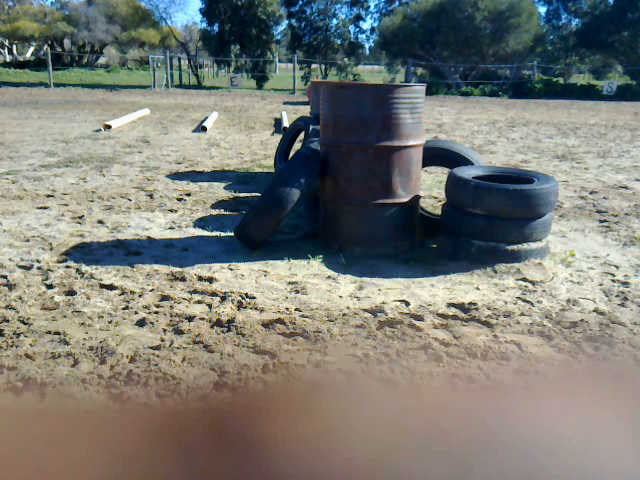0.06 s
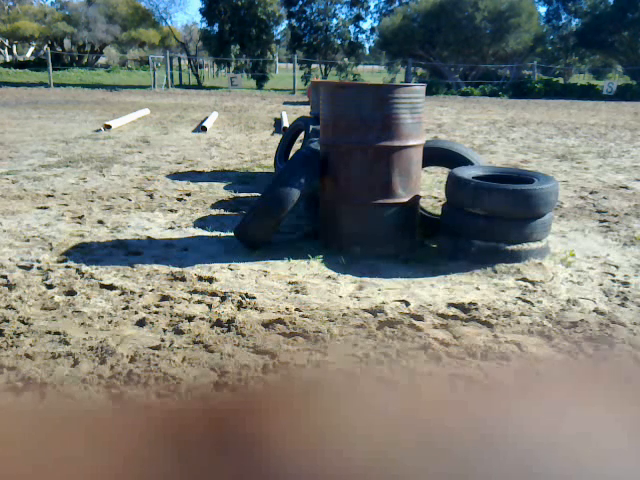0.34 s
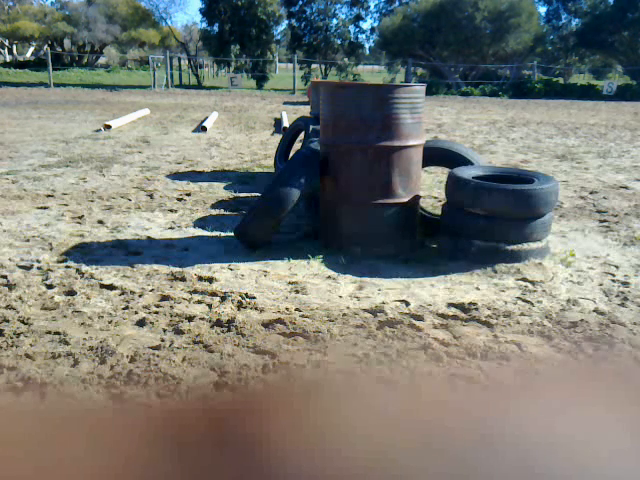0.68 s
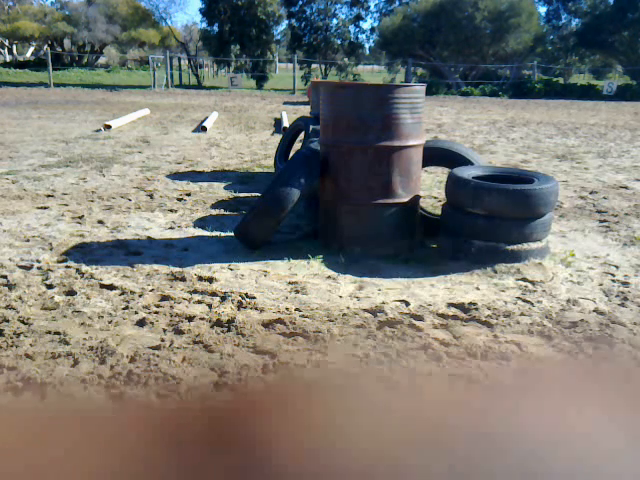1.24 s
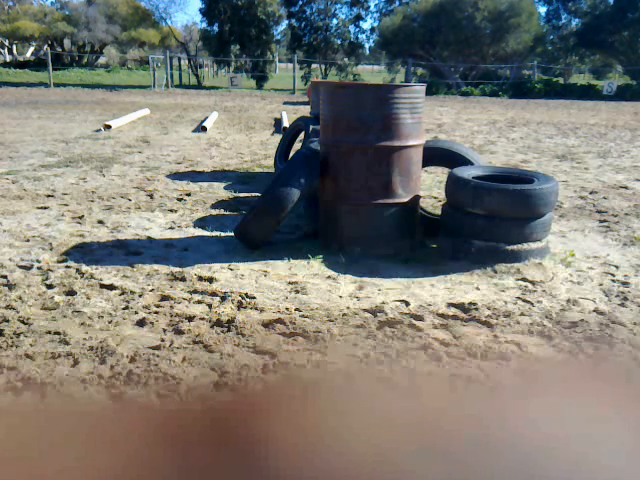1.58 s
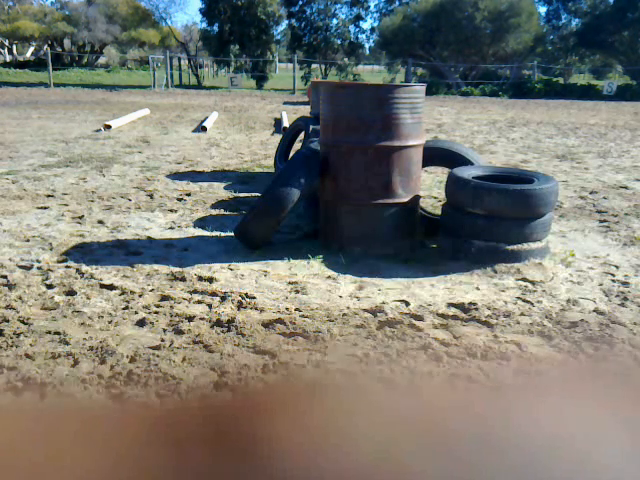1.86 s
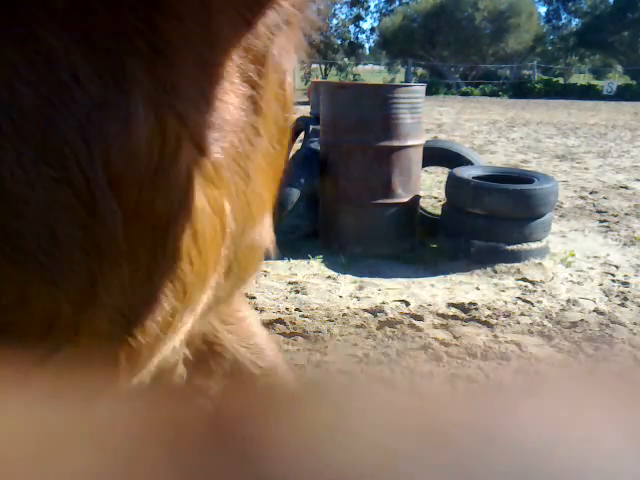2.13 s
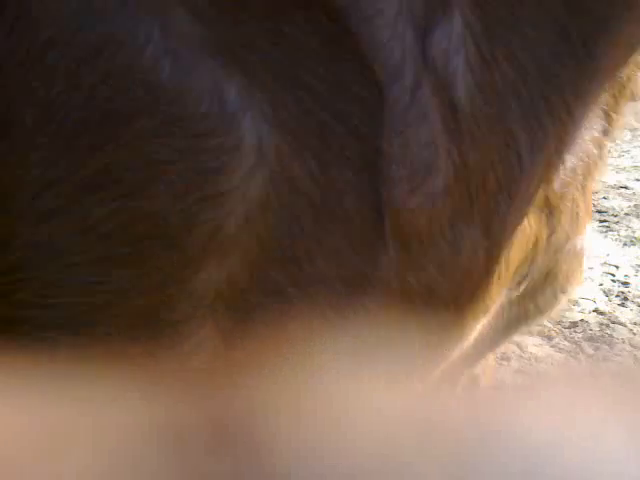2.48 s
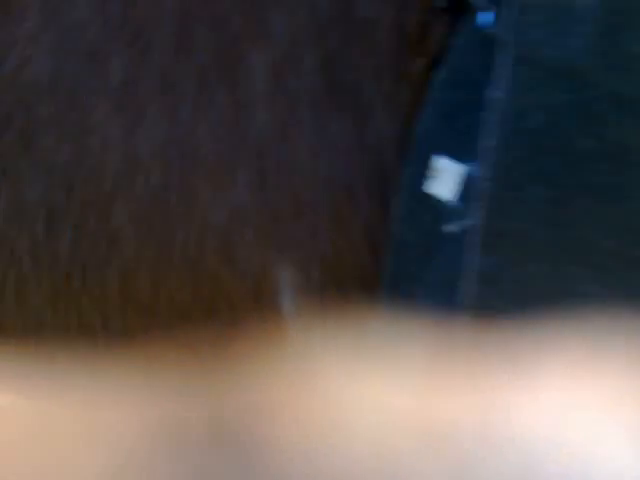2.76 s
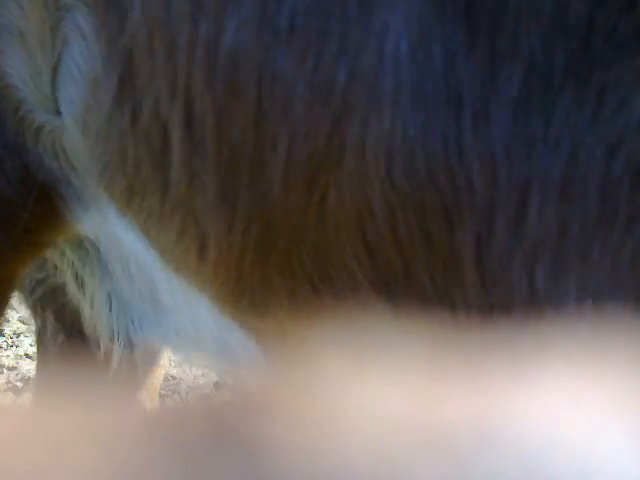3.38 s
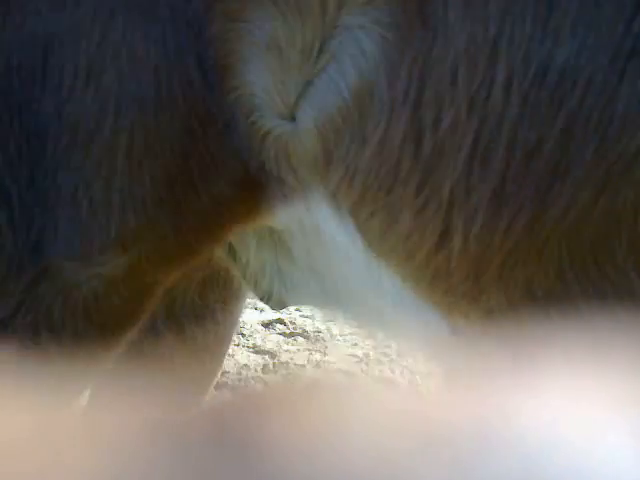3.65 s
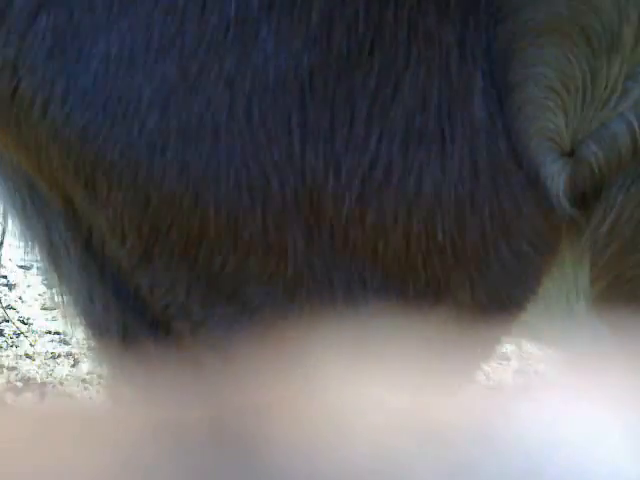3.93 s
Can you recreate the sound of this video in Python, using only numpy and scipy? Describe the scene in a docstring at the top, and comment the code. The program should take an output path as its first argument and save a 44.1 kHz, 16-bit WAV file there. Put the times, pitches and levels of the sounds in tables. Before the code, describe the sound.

Wind rumbles and thumps on a small microphone in uneven gusts, over a faint rush of distant trees. After about a second, a horse walks close by in a sandy paddock, with very soft scuffs and ticks.

```python
"""Wind buffets a small camera's microphone in a sandy paddock, over a bed of distant rushing trees
and the faint whine of the camera's electronics. Almost at once the gusts arrive: faster air gives
louder, quicker eddies. A far bird calls, and single eddies start to thump. From just past one
second a horse walks close by with soft scuffs and ticks in the sand; the bird calls once more,
and the gusts and hooves carry on to the end."""
import sys
import numpy as np
from scipy import signal
from scipy.fft import rfft, irfft
from scipy.io import wavfile
from scipy.ndimage import uniform_filter1d, map_coordinates

SR = 44100
rng = np.random.default_rng(int(sys.argv[2]) if len(sys.argv) > 2 else 0)


def store_wav(level_fs):
    """Save 16-bit WAV to argv[1]."""
    pcm = np.round(np.clip(np.atleast_2d(level_fs), -1, 1) * 32767)
    wavfile.write(sys.argv[1], SR, pcm.T.astype(np.int16))


N = 176400

# light air between the gusts: time_s, level_db
BREEZE_LEVEL = [(0, -33.5), (.15, -30), (.6, -27.5), (.7, -34), (.9, -38.5), (1.22, -40.5), (1.32, -30.5),
                (1.52, -33.5), (1.75, -26), (2.13, -27), (2.2, -40), (2.36, -30.5), (2.8, -29), (2.89, -30),
                (3.05, -27.5), (3.3, -35.5), (3.5, -28.5), (3.86, -29), (3.96, -38), (4, -37.5)]
# gusts on the microphone: start_s, length_s, level_db, eddy_rate_hz
WIND_GUSTS = [(0.198, 0.041, -22, 80.54), (0.304, 0.043, -21.5, 233.6), (0.413, 0.044, -16.5, 179.2),
              (0.481, 0.013, -21.5, 120.5), (.535, 0.082, -26.5, 121.9), (1.398, 0.034, -18.5, 170.2),
              (1.446, 0.024, -24, 149.6), (1.558, 0.029, -21.5, 120.4), (1.628, .026, -29.5, 182.5),
              (1.81, 0.053, -22.5, 125.2), (1.895, 0.019, -22.5, 185.3), (2.002, .03, -30, 135),
              (2.096, 0.037, -35, 124.7), (2.416, 0.087, -27.5, 129.7), (2.546, 0.033, -22.5, 175.5),
              (2.605, 0.047, -17, 148), (2.669, .035, -20, 248.8), (2.709, .032, -29, 220.2),
              (3.065, 0.069, -32, 194.8), (3.159, 0.042, -26.5, 160.3), (3.235, .025, -24, 105.1),
              (3.339, .03, -24.5, 120.6), (3.491, 0.034, -27, 114.6), (3.588, 0.029, -22, 120.3),
              (3.796, 0.034, -20, 116.4)]
# tone of the turbulence at an eddy rate of BASE_EDDY_HZ: frequency_hz, level_db
WIND_SPECTRUM = [(6, -12.5), (20, -2.5), (45, 0), (80, -1.5), (120, -6.5), (190, -17.5), (320, -33),
                 (600, -55), (1500, -92)]
# level of the distant rush, ducking under the wind gusts: time_s, level_db
RUSH_LEVEL = [(0, -47.5), (.33, -48.5), (.42, -51.5), (.7, -52), (.87, -48.5), (1.3, -48.5), (1.5, -50.5),
              (1.9, -52.5), (2.17, -54), (2.42, -52), (2.85, -53), (3.15, -56), (3.45, -52.5), (4, -53.5)]
# tone of the trees' rush: frequency_hz, level_db
RUSH_SPECTRUM = [(100, -2.5), (300, 3.5), (600, -6.5), (800, -3), (1050, 0), (1450, -4.5), (1900, -12.5),
                 (2400, -21), (3100, -36), (5000, -57.5)]
# fine hiss of leaves and air: time_s, level_db
HISS_LEVEL = [(0, -69), (.3, -72), (.65, -75), (1.05, -70), (1.4, -71), (1.7, -70.5), (2.15, -77.5),
              (2.55, -71.5), (3.05, -76.5), (3.5, -72), (4, -75.5)]
# tone of that hiss: frequency_hz, level_db
HISS_SPECTRUM = [(1000, -2.5), (3000, -2), (5500, -4.5), (6700, -5), (7800, -5.5), (9000, -5.5),
                 (12000, -8.5), (15500, -9.5)]
# falling calls of a distant bird: start_s, length_s, level_db, pitch_hz
BIRD_CALLS = [(0.228, 0.044, -80, 3560), (2.363, .06, -82, 3355)]
# lone eddies, each a push and then a pull: time_s, peak_db, half_width_s
EDDY_THUMPS = [(.370, -12, 0.0015), (1.341, -12, .0019), (1.427, -16, 0.0016), (1.465, -11, 0.0019),
               (1.573, -14.5, .0016), (1.899, -19, 0.0009), (1.955, -12.5, 0.0013), (1.978, -13.5, 0.002),
               (2.013, -13, 0.0012), (2.319, -18.5, 0.0018), (2.552, -16, 0.00084), (2.572, -15, 0.0023),
               (2.942, -11.5, 0.0025), (3.008, -13.5, 0.002), (3.11, -20.5, 0.00085),
               (3.468, -11.5, 0.0018), (3.683, -21, 0.0044), (3.824, -12, 0.0026), (3.885, -15, 0.0021)]
# hooves scuffing the sand: start_s, length_s, level_db, centre_hz, width_octaves
HOOF_SCUFFS = [(1.253, 0.0055, -62.5, 5800, 0.75), (1.314, 0.12, -73.5, 5040, 0.6),
               (1.382, 0.014, -60.5, 1981, 0.41), (1.525, 0.0064, -62, 5725, 0.65),
               (1.855, 0.035, -71.5, 4100, 0.63), (2.014, .025, -76, 5550, .55),
               (2.522, 0.035, -77.5, 5130, 0.73), (2.74, 0.056, -79, 3820, 0.59),
               (2.958, 0.029, -78, 5320, .25), (3.158, 0.29, -79, 2700, 0.32),
               (3.239, 0.011, -58, 1100, 0.82), (3.417, 0.027, -68, 2849, 0.44),
               (3.427, .025, -73.5, 8000, 0.53), (3.572, 0.026, -72, 5209, 0.44),
               (3.721, .11, -79.5, 3497, 0.95)]
# ticks and knocks of hooves on grit: time_s, level_db, centre_hz, width_octaves
HOOF_TICKS = [(1.623, -69, 4960, 0.44), (2.177, -68, 4205, .7), (2.237, -66.5, 2200, 0.39),
              (2.934, -42, 557.3, .35), (3.112, -54, 1500, 0.53)]

BASE_EDDY_HZ, BREEZE_EDDY_HZ = 100, 85.76
BREEZE_SPEEDUP = .15  # eddy rate follows the breeze's amplitude to this power
LARGE_EDDY_HZ, LARGE_EDDY_DB = 70.5, -5.5  # big slow eddies: a gust lifts their level, not their speed
EVENNESS, EVEN_WINDOW_S = .92, .034  # how firmly and how fast the rumble's own swells are levelled
RUSH_BRIGHTEN, FLUTTER_DB = .6, 1.0  # extra treble in dB per dB of level; flutter depth
WHINE_HZ, WHINE_DB, WHINE_FLIPS_PER_S = (10282.5, 7711.5), (-75, -92.5), 59.85
WHINE_FOLLOW = .67  # dB of whine per dB of hiss
CALL_FALL_HZ, CALL_EDGE_S = 200, .012
SCUFF_EDGE_S, GRAIN_DB = .0083, 3.5
OVERLOAD_DB, FADE_IN_S, TOP_HZ = -11.5, .006, 15650


def undb(db):
    """Decibels to gain."""
    return 10 ** (np.asarray(db) / 20)


def unit(x):
    """Scale to rms 1."""
    return x / np.sqrt(np.mean(x ** 2))


def curve(t, rows):
    """Straight ramps through rows of time_s, value."""
    return np.interp(t, *np.array(rows).T)


def noise(spectrum):
    """Noise coloured by rows of frequency_hz, level_db."""
    hz, db = np.array(spectrum).T
    f = np.maximum(np.fft.rfftfreq(N, 1 / SR), 1)
    gain = undb(np.interp(np.log(f), np.log(hz), db))
    return unit(irfft(rfft(rng.standard_normal(N)) * gain, N))


def band(x, hz, octaves):
    """A bell-shaped band of x around hz, at rms 1."""
    f = np.maximum(np.fft.rfftfreq(N, 1 / SR), 1)
    bell = np.exp(-.5 * (np.log2(f / hz) / octaves) ** 2)
    return unit(irfft(rfft(x) * bell, N))


def swell(t, start, length, rise_s, fall_s):
    """An envelope that eases up to start, holds for length and eases away."""
    return np.exp(-(np.minimum(t - start, 0) / rise_s) ** 2
                  - (np.maximum(t - start - length, 0) / fall_s) ** 2)


def flutter(rate_hz):
    """Glides between random values, at rms 1."""
    hold = int(SR / rate_hz)
    steps = rng.standard_normal(N)[np.arange(N) // hold]
    return unit(uniform_filter1d(steps, hold))


def buffeting(t):
    """Turbulence rumbles over the microphone: a gust makes it louder and drives its small eddies faster."""
    breeze_db = curve(t, BREEZE_LEVEL)
    power = undb(breeze_db) ** 2
    eddy_hz = BREEZE_EDDY_HZ * undb(BREEZE_SPEEDUP * (breeze_db - breeze_db.mean()))
    for start, length, db, hz in WIND_GUSTS:
        gust = swell(t, start, length, rise_s=.007, fall_s=.01)
        power += (undb(db) * gust) ** 2
        eddy_hz += (hz - eddy_hz) * gust
    air = noise(WIND_SPECTRUM)
    # level the rumble so that breeze and gusts set the dynamics
    air_power = uniform_filter1d(np.abs(signal.hilbert(air)) ** 2, int(EVEN_WINDOW_S * SR), mode="wrap")
    air = unit(air / air_power ** (EVENNESS / 2))
    playhead = np.cumsum(eddy_hz / BASE_EDDY_HZ)  # varispeed: faster air, higher rumble
    small_eddies = map_coordinates(air, [playhead], order=3, mode="grid-wrap")
    large_eddies = band(rng.standard_normal(N), LARGE_EDDY_HZ, octaves=.71)
    return np.sqrt(power) * unit(small_eddies + undb(LARGE_EDDY_DB) * large_eddies)


def trees(t):
    """Far trees make a fluttering rush, duller where its level dips, with a fine leaf hiss on top."""
    db = curve(t, RUSH_LEVEL)
    rush = noise(RUSH_SPECTRUM)
    treble = signal.sosfiltfilt(signal.butter(2, 1600, "high", fs=SR, output="sos"), rush)
    rush += (undb(RUSH_BRIGHTEN * (db - db.mean())) - 1) * treble
    rush *= undb(db + FLUTTER_DB * flutter(rate_hz=28))
    hiss = undb(curve(t, HISS_LEVEL)) * noise(HISS_SPECTRUM)
    return rush + hiss


def whine(t):
    """Two thin electronic tones, buzzing as their polarity flips, ride up and down with the hiss."""
    hiss_db = curve(t, HISS_LEVEL)
    tones = sum(undb(db) * np.sqrt(2) * np.sin(2 * np.pi * hz * t) for hz, db in zip(WHINE_HZ, WHINE_DB))
    polarity = np.sign(np.sin(np.pi * WHINE_FLIPS_PER_S * t))
    return tones * polarity * undb(WHINE_FOLLOW * (hiss_db - hiss_db.mean()))


def bird(t):
    """A far bird's thin whistle, sagging in pitch toward its tail."""
    out = np.zeros(N)
    for start, length, db, hz in BIRD_CALLS:
        pitch_hz = hz - CALL_FALL_HZ * np.clip((t - start) / length, 0, 2) ** 2
        whistle = np.sin(2 * np.pi * np.cumsum(pitch_hz) / SR)
        out += undb(db) * swell(t, start, length, CALL_EDGE_S, CALL_EDGE_S) * whistle
    return out


def thumps(t):
    """A lone eddy crosses the microphone port: pressure builds, flips to suction and recovers."""
    out = np.zeros(N)
    for at, db, half_width in EDDY_THUMPS:
        crossing = (t - at) / half_width
        out -= 2 * undb(db) * np.tanh(crossing) / np.cosh(np.clip(crossing, -20, 20))
    return out


def sand():
    """A dense texture of sand grains, unequal in size but none very large."""
    return rng.standard_normal(N) * undb(GRAIN_DB * np.minimum(rng.exponential(size=N), 2))


def hooves(t):
    """Hooves brush the sand in soft scuffs and catch the grit in short ticks."""
    out = np.zeros(N)
    for start, length, db, hz, octaves in HOOF_SCUFFS:
        out += undb(db) * swell(t, start, length, SCUFF_EDGE_S, SCUFF_EDGE_S) * band(sand(), hz, octaves)
    for at, db, hz, octaves in HOOF_TICKS:
        out += undb(db) * swell(t, at, 0, rise_s=.0012, fall_s=.006) * band(sand(), hz, octaves)
    return out


def scene():
    """A mono mix: wind up front, soft-clipped where it overloads, and the quiet paddock behind."""
    t = np.arange(N) / SR
    wind = buffeting(t) + thumps(t)
    wind /= (1 + (wind / undb(OVERLOAD_DB)) ** 4) ** (1 / 4)
    return (wind + trees(t) + whine(t) + bird(t) + hooves(t))[None]


def record(dry):
    """A quick fade-in and a steep cut of the very top end."""
    fade_in = np.sin(np.pi / 2 * np.minimum(np.arange(N) / SR / FADE_IN_S, 1)) ** 2
    high_cut = signal.ellip(10, .2, 70, TOP_HZ, fs=SR, output="sos")
    return signal.sosfilt(high_cut, dry * fade_in)


dry = scene()
out = record(dry)
store_wav(out)
```